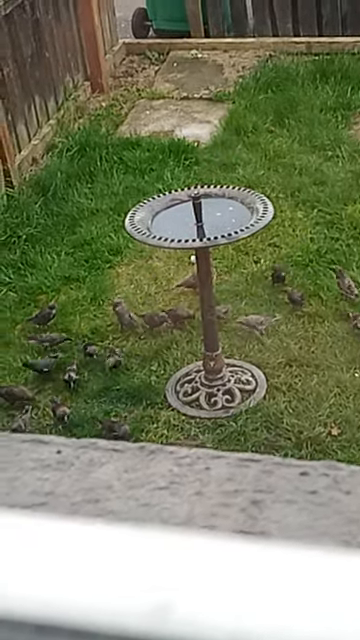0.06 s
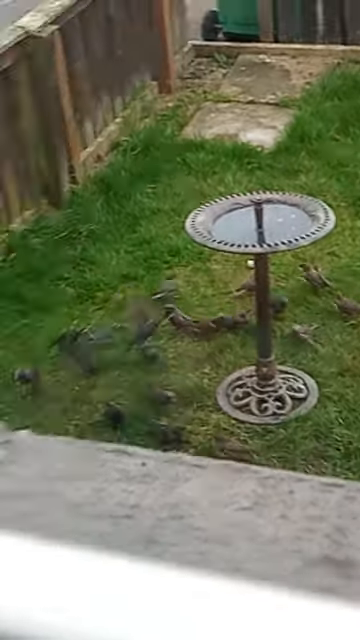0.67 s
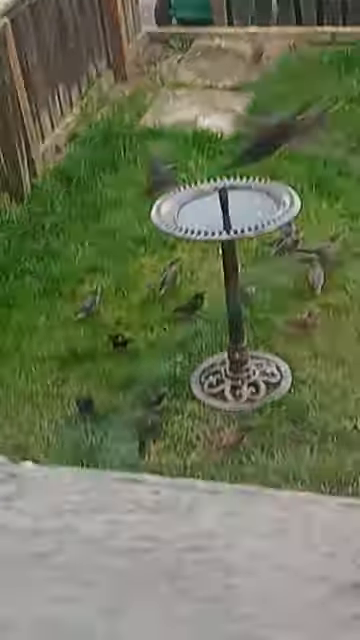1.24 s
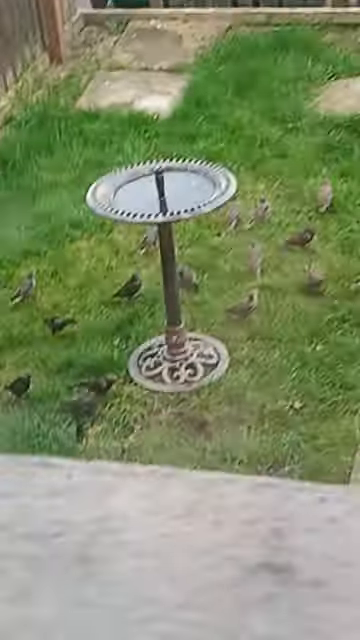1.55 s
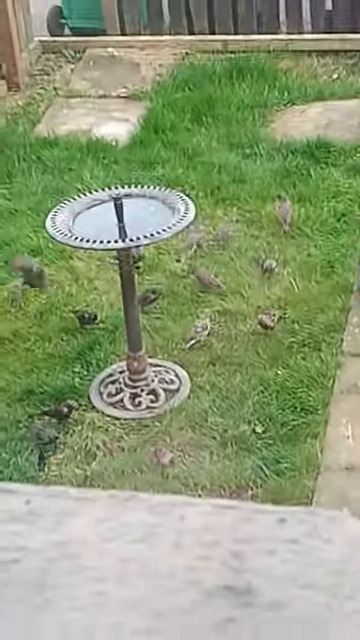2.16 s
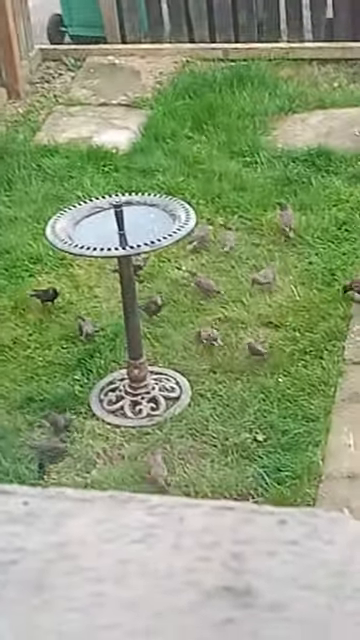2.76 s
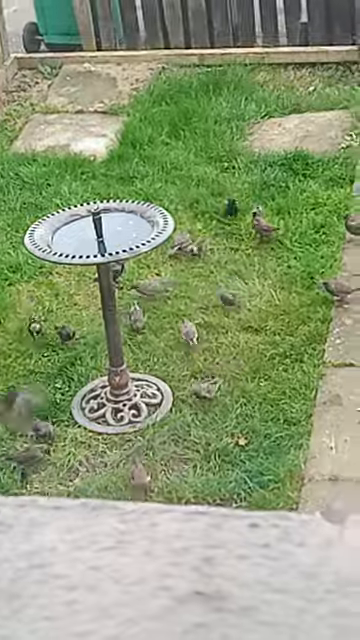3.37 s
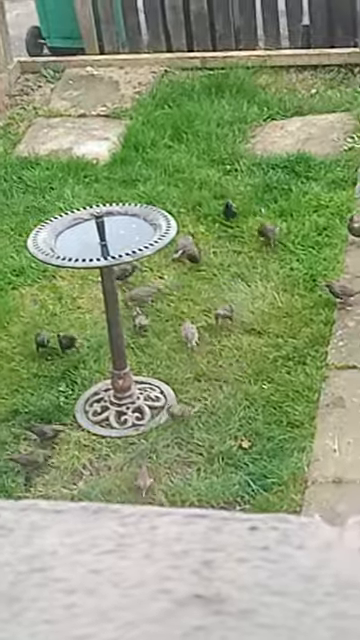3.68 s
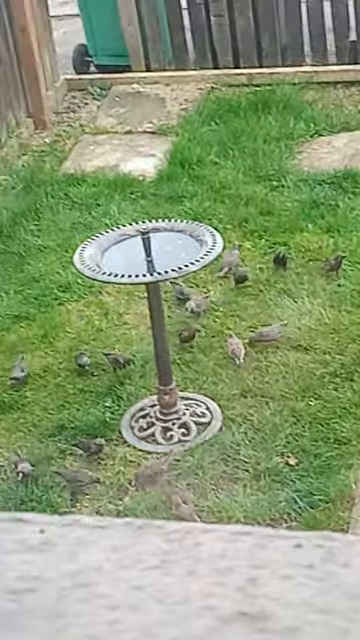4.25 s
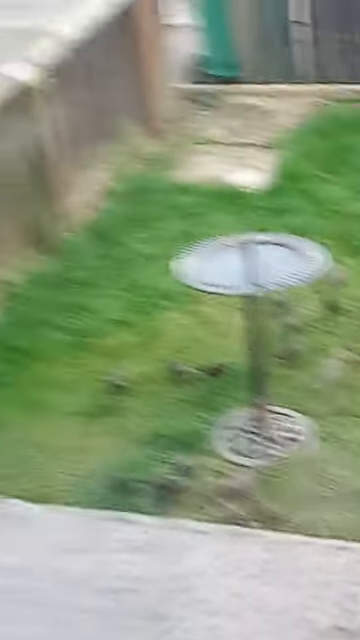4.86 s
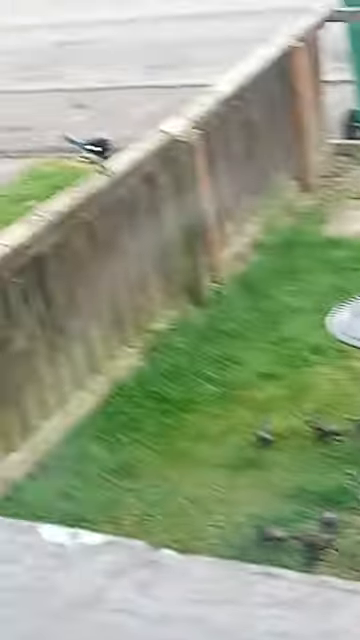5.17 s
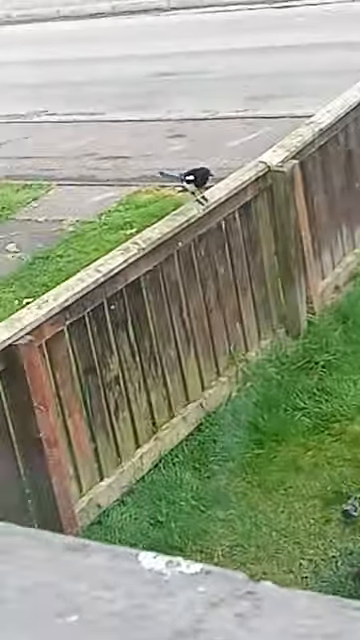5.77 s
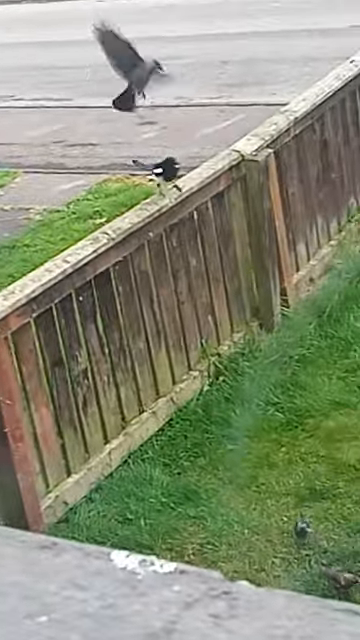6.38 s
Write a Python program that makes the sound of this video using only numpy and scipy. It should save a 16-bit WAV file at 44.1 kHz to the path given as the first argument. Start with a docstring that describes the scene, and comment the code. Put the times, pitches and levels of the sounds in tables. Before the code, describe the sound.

A camera knocks once against a window pane in a quiet room, with faint hand rubbing, small ticks and light bumps.

```python
"""A small camera knocks once against a closed window: the pane booms briefly and the casing rattles.
Leading up to it, a hand shifts its hold, so the casing ticks under strain and skin rubs across it.
Two light bumps of the hand follow later, dull and hollow, the first with a tick and a scuff.
Underneath lies a quiet room: the low hum of a distant machine, dull air and a faint hiss."""
import sys
import numpy as np
from scipy import signal
from scipy.fft import rfft, irfft
from scipy.io import wavfile

SR = 44100
rng = np.random.default_rng(int(sys.argv[2]) if len(sys.argv) > 2 else 0)


def output_pcm(signal):
    """Save a mono or channel-first signal as 16-bit PCM at the path in sys.argv[1].

    Samples are clipped to [-1, 1] before scaling.
    """
    pcm = np.clip(np.atleast_2d(signal).T, -1, 1) * 32767
    wavfile.write(sys.argv[1], SR, np.round(pcm).astype(np.int16))


N = 283122
TIME = np.arange(N) / SR

# The machine's odd harmonics. Each row: multiple of its base rate, rms level in dB.
HUM_HARMONICS = [(3, -69.5), (5, -60), (7, -69.5), (9, -68.5), (11, -82)]
# The colour of the room tone. Each row: frequency in Hz, relative level in dB.
AIR_SPECTRUM = [(28, -19.5), (45, 8.5), (110, 0), (190, -0.5), (320, -7), (700, -10.5), (1500, -14.5),
                (2500, -20), (4200, -25), (6000, -37.5), (8200, -27), (10000, -28), (13000, -24.5),
                (15600, -31), (16200, -54.5)]
# Ticks of the casing: strain ticks as the hand shifts its hold, a clack as the knock lands, and a tick with the
# first bump. Each row: start in seconds, drive to the casing's upper resonance in dB, drive to the lower one in
# dB relative to that.
CASING_TICKS = [(0.4793, -6.5, -18), (0.5071, -35.5, 1.5), (0.5305, -19.5, -10.5), (1.5759, 15, -2.5),
                (4.8484, -12.5, -14)]
# The casing's two treble resonances, lower first. Each row: centre in Hz, width in Hz.
CASING_MODES = [(7700, 1575.8), (12400, 2930)]
# The colour of the reverb. Each row: frequency in Hz, relative band level in dB.
REVERB_SPECTRUM = [(60, -23), (250, -19), (600, -17.5), (1200, -16), (3000, -13), (7000, -28), (12000, -30),
                   (16000, -28)]
# The reverb's tail. Each row: frequency in Hz, seconds to fade by 60 dB.
REVERB_DECAY = [(60, .2), (300, .22), (1000, .16), (4000, .12), (12000, .09)]
# Fingertip scuffs. Each row: time of reaching full level in seconds, that level in dB.
FINGER_SCUFFS = [(0.478, -63), (4.849, -64)]
# The low body of the rub. Each row: centre in Hz, width in Hz, relative level in dB.
RUB_LOW_MODES = [(255.4, 130, 0), (351.4, 290, 1)]
# The bright edge of the rub. Each row: centre in Hz, width in Hz, relative level in dB.
RUB_HIGH_MODES = [(580, 110, 1.5), (1038, 260, 2), (1230, 140, -14), (2420, 2500, -22.5)]
# The dead thud of the knock. Each row: centre in Hz, width in Hz, gain in dB.
THUD_MODES = [(90.88, 60, 32), (175, 110, 30.5), (522.55, 108.8, 11), (826, 160, 17.5)]
# The pane ringing on. Each row: frequency in Hz, relative level in dB.
PANE_MODES = [(63.0, -20), (83.0, -34), (133.0, -29.5), (145.0, -31.5), (188.0, -39.5), (218.0, -31.5),
              (229.0, -26.5), (271.0, -35.5), (303.0, -27), (334.0, -28.5), (384.0, -39), (405.0, -33),
              (434.0, -45.5), (497.0, -32), (565.0, -31.5), (641.0, -36.5), (741.0, -42.0), (799.0, -41),
              (812.0, -42), (863.0, -43.5), (885.0, -40.5), (943.0, -50), (1005.0, -41), (1073.0, -43.5),
              (1154.0, -47.5), (1264.0, -51)]
# The pane's tail. Each row: frequency in Hz, seconds to fade by 60 dB.
PANE_DECAY = [(60, .21), (130, .25), (230, .31), (550, .245), (1000, .17)]
# Soft bumps of the hand. Each row: start in seconds, thump gain in dB, thump pitch in Hz,
# after-ring gain in dB, after-ring pitch in Hz, crack gain in dB.
HAND_BUMPS = [(4.8474, -1, 264, -42.5, 158, -26.5), (5.6160, -7.5, 285, -52.5, 274, -55.5)]
# The hollow of the held body. Each row: frequency in Hz, gain in dB relative to the thump's,
# seconds to fade by 60 dB.
HOLLOW_MODES = [(409, -63.5, 0.23), (529.4, -61, .27)]


def from_db(db):
    """Decibels to gain."""
    return 10 ** (np.asarray(db) / 20)


def unit_rms(x):
    """Scale to an rms of 1."""
    return x / np.sqrt(np.mean(x ** 2) + 1e-20)


def at_hz(points, hz):
    """Read a table on a log-frequency axis."""
    known_hz, values = np.transpose(points)
    return np.interp(np.log(np.maximum(hz, 1)), np.log(known_hz), values)


def cut(x, hz, kind, order):
    """Causal Butterworth filter."""
    return signal.sosfilt(signal.butter(order, hz, kind, fs=SR, output="sos"), x + 1e-18)


def resonate(x, hz, width_hz):
    """A resonance with a gain of 1 at its peak."""
    r, w = np.exp(-np.pi * width_hz / SR), 2 * np.pi * hz / SR
    return signal.lfilter(np.array([1, 0, -1]) * (1 - r * r) / 2, [1, -2 * r * np.cos(w), r * r], x + 1e-18)


def resonate_twice(x, hz, width_hz):
    """Two passes through a resonance, for steeper skirts."""
    return resonate(resonate(x, hz, width_hz), hz, width_hz)


def ring(x, hz, t60):
    """A unit click sets a sine of height 1 ringing."""
    r, w = np.exp(-np.log(1000) / (t60 * SR)), 2 * np.pi * hz / SR
    return signal.lfilter([0, np.sin(w)], [1, -2 * r * np.cos(w), r * r], x + 1e-18)


def coloured_noise(gain_at):
    """Noise of rms 1 whose spectrum follows a function of frequency."""
    spectrum = rfft(rng.standard_normal(N)) * gain_at(np.fft.rfftfreq(N, 1 / SR))
    return unit_rms(irfft(spectrum, N))


def drift(rate_hz):
    """A random wobble of rms 1, mostly slower than the given rate."""
    return coloured_noise(lambda hz: 1 / (1 + (hz / rate_hz) ** 2))


def swell(from_s, to_s, rise_db_per_s, fade_db_per_s):
    """An envelope that rises, holds at 1 between two times, and fades."""
    early_s, late_s = np.maximum(from_s - TIME, 0), np.maximum(TIME - to_s, 0)
    return from_db(-rise_db_per_s * early_s - fade_db_per_s * late_s)


def clicks(times, levels_db):
    """One click for each time and level."""
    return np.bincount(np.round(np.asarray(times) * SR).astype(int), from_db(levels_db), N)


def machine_hum(base_hz=18.56, waver=.21, waver_hz=2.6, slip_rad=.05):
    """A distant machine drones through the walls; its speed and its tones waver a little."""
    phase = 2 * np.pi * base_hz * TIME + slip_rad * drift(waver_hz)
    return sum(from_db(db) * np.sqrt(2) * np.sin(k * phase) * (1 + waver * drift(waver_hz))
               for k, db in HUM_HARMONICS)


def room_tone(level_db=-60.5, hiss_from_hz=6000, waver_db=.23, waver_hz=1.501):
    """A bed of dull air, with a thin, slightly wavering hiss on top."""
    air = from_db(level_db) * coloured_noise(lambda hz: from_db(at_hz(AIR_SPECTRUM, hz)))
    hiss = irfft(rfft(air) * (np.fft.rfftfreq(N, 1 / SR) > hiss_from_hz), N)
    return air + hiss * (from_db(waver_db * drift(waver_hz)) - 1)


def finger_scuffs(hold_s=.036, lower_db=-9, grain_db=2, grain_hz=150, top_hz=13500):
    """A fingertip's fine friction keeps the casing's resonances hissing, mostly the upper one."""
    friction = rng.standard_normal(N) * from_db(grain_db * drift(grain_hz))
    friction = cut(friction, top_hz, "low", order=12)
    lower, upper = (resonate_twice(friction, hz, width) for hz, width in CASING_MODES)
    envelope = sum(from_db(db) * swell(s, s + hold_s, rise_db_per_s=600, fade_db_per_s=197)
                   for s, db in FINGER_SCUFFS)
    return envelope * unit_rms(from_db(lower_db) * lower + upper)


def casing(snaps, pings, tick_crack_db=-21.5):
    """The casing cracks and rings brightly, from its own ticks and from the hits passed in."""
    times, upper_db, lower_offset_db = np.transpose(CASING_TICKS)
    lower_ticks, upper_ticks = clicks(times, upper_db + lower_offset_db), clicks(times, upper_db)
    rattle = crunch(pings)
    ringing = sum(resonate_twice(rattle + ticks, hz, width)
                  for ticks, (hz, width) in zip((lower_ticks, upper_ticks), CASING_MODES))
    grit = crunch(snaps + from_db(tick_crack_db) * lower_ticks)
    return cut(grit, [2300, 8500], "band", order=2), ringing


def crunch(x, decay_s=.0011):
    """Hard surfaces meet in a brief burst of tiny contacts."""
    burst = rng.standard_normal(SR // 100) * np.exp(-TIME[:SR // 100] / decay_s)
    return signal.fftconvolve(x, burst / np.linalg.norm(burst))[:N]


def reverb(x, build_s=.007):
    """The room's diffuse reflections build up, then die away band by band."""
    t = TIME[:SR // 2]
    edges_hz = np.geomspace(45, 17000, 13)
    response = 0
    for low, high in zip(edges_hz, edges_hz[1:]):
        hz = np.sqrt(low * high)
        envelope = np.exp(-np.log(1000) * t / at_hz(REVERB_DECAY, hz)) * (1 - np.exp(-t / build_s))
        band = cut(rng.standard_normal(len(t)), [low, high], "band", order=2)
        response += from_db(at_hz(REVERB_SPECTRUM, hz)) * band * envelope / np.linalg.norm(envelope)
    return signal.fftconvolve(x, response)[:N]


def sliding_hand(peak_s=1.09, slide_db=-54.5, grip_db=-60.5, light_touch_db=-10, grain_db=2, grain_hz=35):
    """Skin sticks and slips ever faster, then stops; a firm grip near the end brightens the rub."""
    slide = from_db(slide_db) * swell(peak_s, peak_s, rise_db_per_s=27.5, fade_db_per_s=129.5)
    grip = from_db(grip_db) * swell(from_s=.978, to_s=1.171, rise_db_per_s=500, fade_db_per_s=500)
    friction = rng.standard_normal(N) * from_db(grain_db * drift(grain_hz))
    body, edge = (sum(from_db(db) * resonate_twice(friction, hz, width) for hz, width, db in modes)
                  for modes in (RUB_LOW_MODES, RUB_HIGH_MODES))
    return slide * unit_rms(body) + np.hypot(from_db(light_touch_db) * slide, grip) * unit_rms(edge)


def knock(start_s=1.5672, touches=4, first_gap_s=.0036, spread=2.127, rebound_loss_db=8):
    """The camera hits and rebounds ever later and weaker: pushes for the pane, the rest for the casing."""
    k = np.arange(touches)
    times = start_s + first_gap_s * k ** spread
    loss_db = rebound_loss_db * k
    is_rebound = k > 0   # rebounds lose extra weight and ring, but not extra snap
    pushes = clicks(times, levels_db=-.47 - loss_db - 12 * is_rebound)
    snaps = clicks(times, levels_db=-5.5 - loss_db)
    pings = clicks(times, levels_db=1.66 - loss_db - 8.5 * is_rebound)
    return pushes, snaps, pings


def window_pane(pushes, soft_hz=1060, boom_db=.06):
    """The pane answers a push with a dead thud and a short, ringing boom."""
    force = cut(pushes, soft_hz, "low", order=6)   # the contact lasts about a millisecond
    thud = sum(from_db(db) * resonate(force, hz, width) for hz, width, db in THUD_MODES)
    boom = sum((-1) ** k * from_db(db + boom_db) * ring(force, hz, at_hz(PANE_DECAY, hz))
               for k, (hz, db) in enumerate(PANE_MODES))
    return thud, boom


def ticks_and_knock(crack_send_db=1.5, ring_send_db=-6, low_cut_hz=50):
    """Casing and pane sound together; all but the pane's boom feeds the reverb."""
    pushes, snaps, pings = knock()
    crack, ringing = casing(snaps, pings)
    thud, boom = window_pane(pushes)
    reflections = reverb(thud + from_db(crack_send_db) * crack + from_db(ring_send_db) * ringing)
    return cut(thud + boom + crack + ringing + reflections, low_cut_hz, "high", order=4)


def hand_bumps(soft_hz=620, crack_band_hz=(1200, 9500), send_db=7):
    """Flesh gives a dull thump and a small crack, and the held body rings briefly, low and hollow."""
    hits, rings = 0, 0
    for start_s, thump_db, thump_hz, ring_db, ring_hz, crack_db in HAND_BUMPS:
        touch = signal.unit_impulse(N, round(start_s * SR))
        push = cut(touch, soft_hz, "low", order=3)
        hits += from_db(thump_db) * resonate(push, thump_hz, width_hz=230)
        hits += from_db(crack_db) * cut(crunch(touch), crack_band_hz, "band", order=2)
        rings += from_db(ring_db) * ring(push, ring_hz, t60=.17)
        rings += sum(from_db(thump_db + db) * ring(push, hz, t60) for hz, db, t60 in HOLLOW_MODES)
    return hits + rings + from_db(send_db) * reverb(hits)


def scene():
    """The knock and the handling sounds over the steady room, in mono."""
    handling = ticks_and_knock() + hand_bumps() + finger_scuffs() + sliding_hand()
    return (handling + machine_hum() + room_tone())[None]


def record(dry, stop_hz=16900):
    """A steep high cut takes off the very top."""
    return signal.sosfilt(signal.cheby2(16, 70, stop_hz, fs=SR, output="sos"), dry)


dry = scene()
out = record(dry)
output_pcm(out)
```